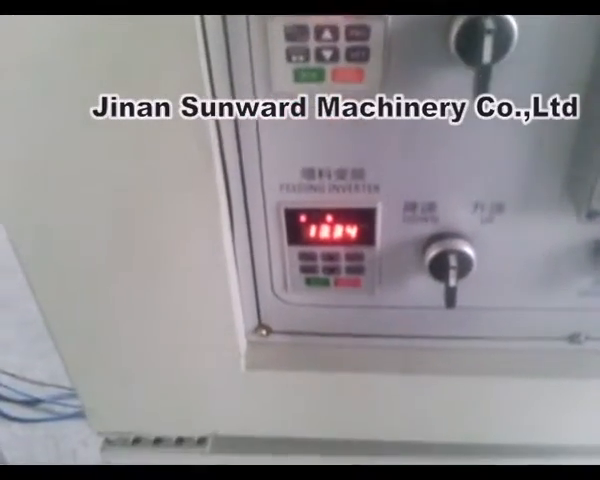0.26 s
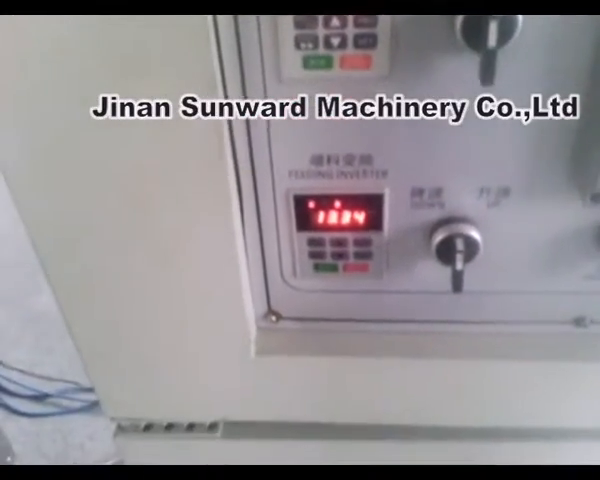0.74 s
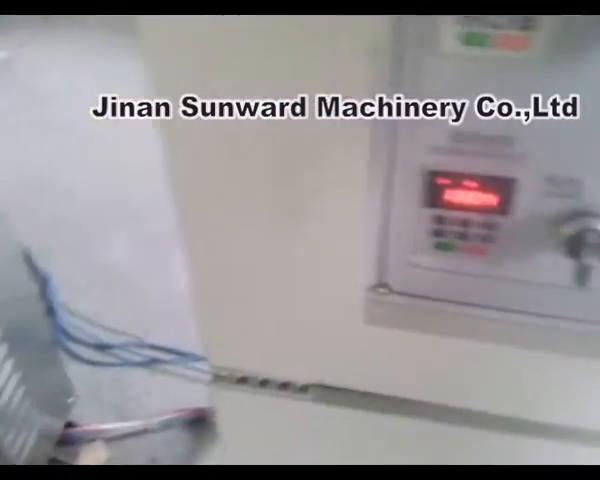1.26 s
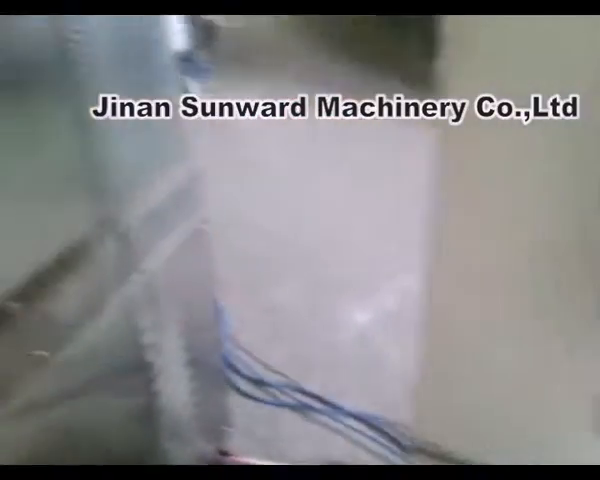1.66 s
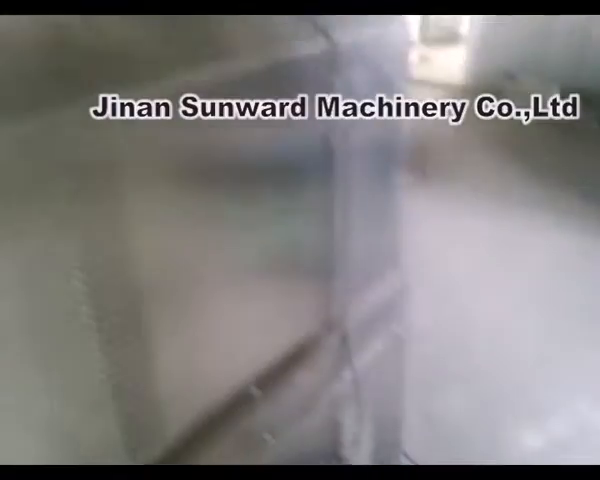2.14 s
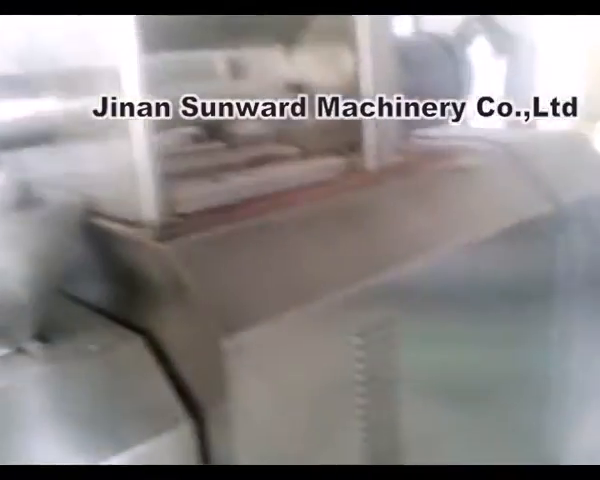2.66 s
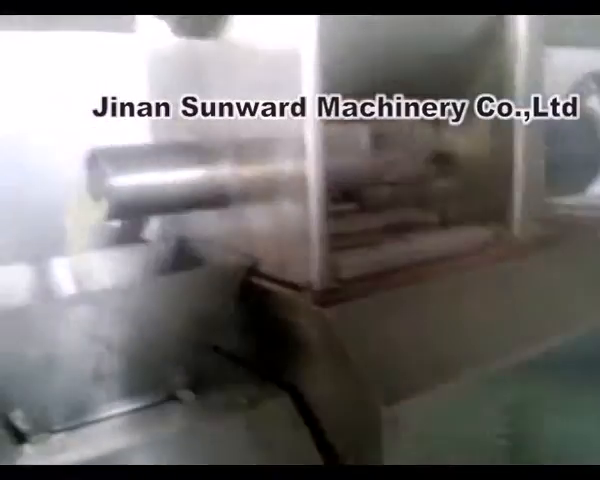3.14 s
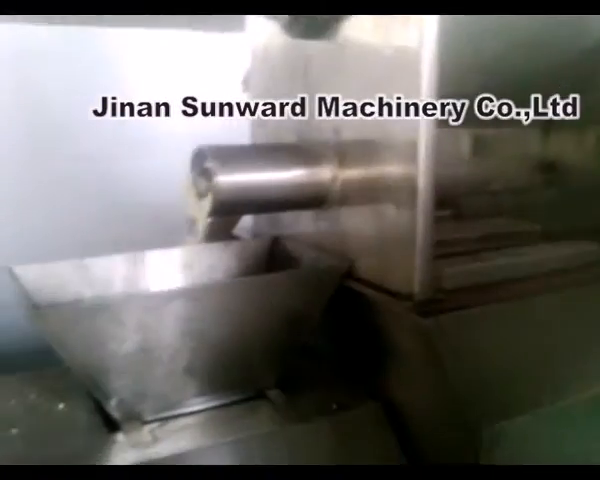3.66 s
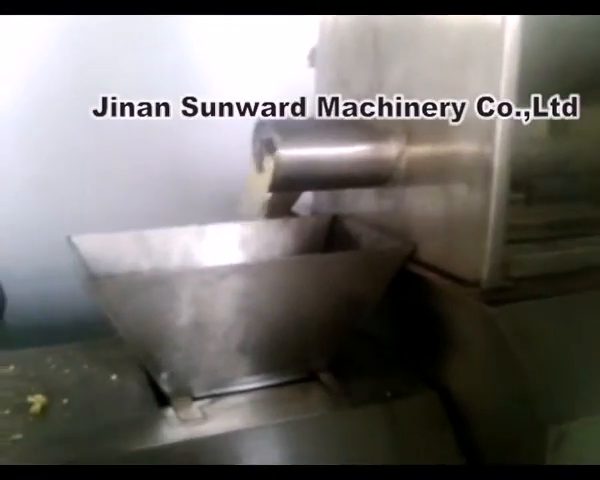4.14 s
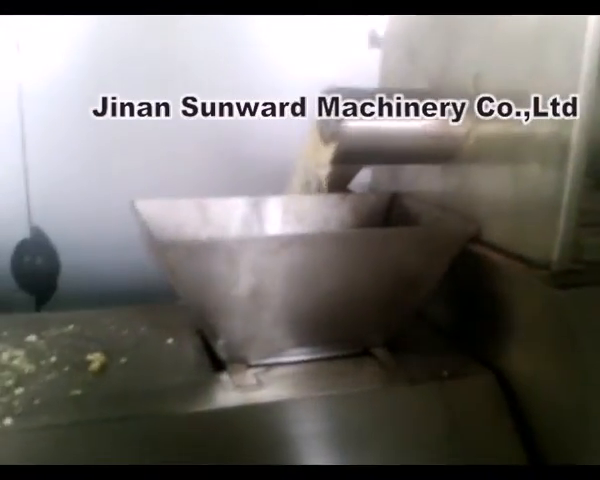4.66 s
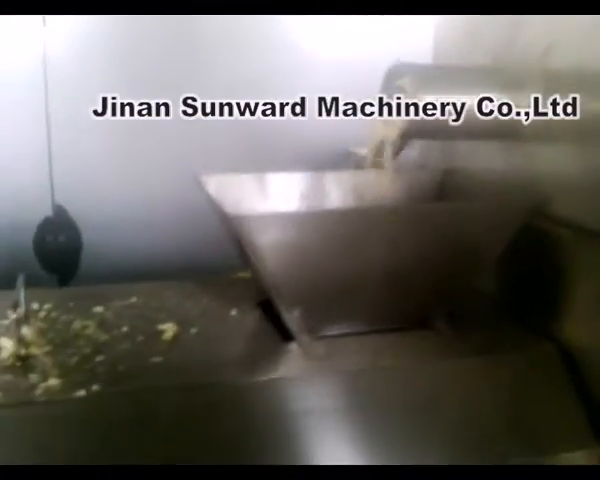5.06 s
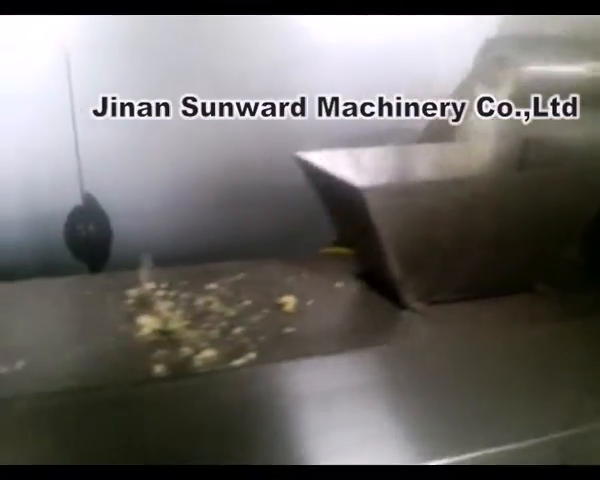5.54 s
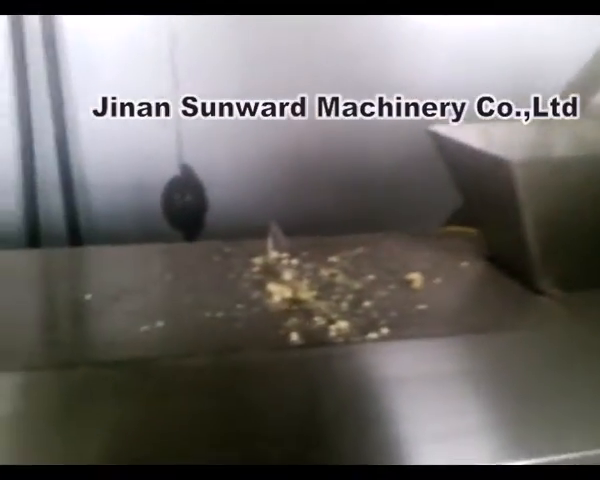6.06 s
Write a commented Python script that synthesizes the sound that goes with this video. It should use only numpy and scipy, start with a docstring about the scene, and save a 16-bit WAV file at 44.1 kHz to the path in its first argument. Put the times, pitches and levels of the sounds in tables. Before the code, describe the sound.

A food machine drones and rumbles steadily under a high wavering electric motor whine, with one sharp metallic knock and faint panel rattles early on.

```python
"""In a workshop a food machine drones while a phone is carried past it. The whine of its inverter-fed motor
is a set of carrier sidebands that fade one by one in the room's standing waves. The gearbox rings in mesh
bands that flare, over rumble, body noise and hiss. A metal part knocks and loose panels rattle.
The phone's low sampling rate cuts the top; crude rate converters leave faint images of the treble."""
import sys
import numpy as np
from scipy import signal
from scipy.fft import rfft, irfft, next_fast_len
from scipy.io import wavfile
from scipy.ndimage import uniform_filter1d, map_coordinates

SR = 44100
rng = np.random.default_rng(int(sys.argv[2]) if len(sys.argv) > 2 else 0)


def generate_wav(sig):
    """Save sig (samples, or channels by samples) to the path in sys.argv[1] as 16-bit PCM at SR."""
    pcm = np.round(np.clip(np.atleast_2d(sig).T, -1, 1) * 32767).astype(np.int16)
    wavfile.write(sys.argv[1], SR, pcm)


def amplitude_ratio(level_db):
    """Convert a level in decibels to the matching linear amplitude (field) ratio."""
    exponent = np.asarray(level_db, float) / 20
    return 10 ** exponent


N = 277830
T = np.arange(N) / SR  # time in seconds


def unit(x):
    """Scaled to rms 1."""
    return x / np.sqrt(np.mean(np.abs(x) ** 2) + 1e-20)


def curves(rows):
    """One value per sample for each column after the time, by straight lines between the rows."""
    seconds, *columns = np.transpose(rows)
    return [np.interp(T, seconds, column) for column in columns]


def wobble(rate):
    """A smooth random curve with rate knots a second."""
    knots = rng.standard_normal(int(N * rate / SR) + 4)
    return map_coordinates(knots, [T * rate])


def filtered(x, response):
    """x shaped by a response, a function of frequency in Hz."""
    m = next_fast_len(N + 8192)
    return irfft(rfft(x, m) * response(np.fft.rfftfreq(m, 1 / SR)), m)[:N]


def bell(hz, centre_hz, width_hz):
    """Gain of a resonance, 1 at its centre."""
    return 1 / np.sqrt(1 + (2 * (hz - centre_hz) / width_hz) ** 2)


def rush(spectrum, patchy_db):
    """Coloured noise of rms 1, with patches of random gain in time and frequency."""
    cells = signal.stft(rng.standard_normal(N), nperseg=512)[2]
    field = uniform_filter1d(rng.standard_normal(cells.shape), size=5, axis=0)
    field = uniform_filter1d(field, size=10, axis=1)
    noise = signal.istft(cells * amplitude_ratio(patchy_db * unit(field)), nperseg=512)[1][:N]
    at_hz, at_db = np.transpose(spectrum)

    def colour(hz):
        return amplitude_ratio(np.interp(np.log(hz + 1), np.log(at_hz), at_db, -120, -120))

    return unit(filtered(noise, colour))


def tone(hz, drift, rough, phase=None):
    """A sine, rms 1 before its flutter, with slow phase drift and fast flutter that spreads a skirt around it."""
    flutter = rough * (1.42 * wobble(16) + wobble(40) + .5 * wobble(250))
    start = 2 * np.pi * rng.random() if phase is None else phase
    angle = 2 * np.pi * hz * T + start + drift * wobble(3) + rough * wobble(60)
    return np.sqrt(2) * (1 + flutter) * np.sin(angle)


def passing(events, hz, width_hz):
    """Summed dB of the bell-shaped events that lie near a pitch."""
    total_db = 0 * T
    for s, at_hz, db, spread_s in events:
        if abs(hz - at_hz) < 3 * width_hz:
            off_pitch, off_time = (hz - at_hz) / width_hz, (T - s) / spread_s
            total_db += db * np.exp(-.5 * off_pitch ** 2 - .5 * off_time ** 2)
    return total_db


def whine():
    """The switching carrier and its double, split by the drive frequency and hazed with noise; slot tones."""
    carrier_hz, drive_hz = 3349.55, 23.92
    node_width_hz = 16  # a node spares the neighbouring tones
    haze_follows = 0.58  # share of the whine's swings in dB
    # Whine tones. Each row: carrier multiple, drive multiple.
    sidebands = [(1, -5), (1, -1), (1, 1), (1, 5), (2, -2), (2, 0), (2, 2)]
    # Strength of those tones away from any node, one relative dB for each.
    shares_db = [-5, -3, -4, -6.5, -3.5, -0.5, -10.5]
    # Slot tones. Each row: pitch in Hz, rms in dB away from any node.
    slots = [(6154, -58), (6202.4, -39.5), (6381, -42), (6487, -50), (6593.5, -40), (6795, -55),
             (6808, -56), (6912, -56), (7196.3, -50)]
    # Whine reaching the walking microphone. Each row: time in seconds, level in dB around the carrier,
    # level in dB around its double.
    whine_levels = [(0.0, -40, -22.5), (0.26, -38.5, -30.5), (1.21, -35, -23), (1.26, -29.5, -19.5),
                    (1.58, -29.5, -18), (1.75, -24.5, -18.5), (1.93, -33, -28.5), (2.17, -30, -32.5),
                    (2.39, -36.5, -22.5), (2.47, -39, -24), (2.63, -29.5, -28), (2.72, -34, -23.5),
                    (2.91, -31.5, -35), (3.09, -34, -26), (3.26, -32, -37.5), (3.4, -30, -25.5),
                    (3.58, -36, -36), (3.67, -35.5, -26.5), (3.91, -33, -30.5), (4.16, -30.5, -22.5),
                    (4.74, -34.5, -32.5), (5.19, -35, -25), (5.51, -33.5, -34), (5.74, -29.5, -29.5),
                    (5.88, -37.5, -27.5), (6.3, -33.5, -35)]
    # Standing-wave nodes and crests that the microphone passes. Each row: middle in seconds, tone in Hz,
    # change in dB (within the carrier groups before their overall level is set), time spread in seconds.
    nodes = [(0.0, 6699, -16, 0.18), (0.05, 6202, -9, 0.21), (1.22, 6202, -6, 0.12),
             (2.45, 6381, -14, 0.04), (0.48, 3373, -17, 0.3), (0.64, 6699, -14, 0.045),
             (0.6, 6381, -15, 0.55), (0.68, 7196, -13, 0.65), (1.65, 6381, -14, 0.12),
             (1.62, 3469, -10, 0.34), (1.96, 6699, -15, 0.077), (2.0, 6652, -12.5, 0.47),
             (2.12, 6699, -14, 0.04), (2.28, 6747, -16, 0.044), (2.22, 6594, -14, 0.1),
             (2.45, 6202, -9, 0.21), (2.4, 3326, -9, 0.039), (2.45, 3469, -6, 0.07), (2.8, 3469, -10, 0.05),
             (3.2, 3469, -8, 0.055), (3.25, 6202, -9, 0.068), (2.56, 6699, -19, 0.055),
             (2.6, 6652, -23, 0.069), (2.8, 6699, -16, 0.085), (3.04, 3230, -13, 0.31),
             (2.95, 6202, -10, 0.05), (3.08, 3373, -20, 0.054), (3.3, 7196, -12, 0.35),
             (3.15, 6381, -12, 0.04), (3.45, 6652, -12, 0.1), (3.53, 3373, -10, 0.12),
             (3.5, 6381, -16, 0.1), (3.8, 6381, -16, 0.1), (3.72, 3326, -18, 0.075), (3.4, 6594, -20, 0.07),
             (3.68, 6747, -22, 0.1), (3.81, 6699, -20, 0.07), (3.95, 6202, -12, 0.16),
             (4.1, 3469, -9, 0.22), (4.16, 6652, -9.5, 0.14), (4.22, 6747, -14, 0.12),
             (4.4, 3230, -27, 0.39), (4.2, 6594, -18, 0.25), (4.85, 6594, -16, 0.13),
             (4.74, 6699, -20, 0.08), (4.8, 6381, -18, 0.25), (4.95, 6202, -17, 0.3),
             (5.95, 6699, -12, 0.04), (5.42, 6652, -14, 0.1), (5.52, 6699, -9, 0.1),
             (5.48, 3373, -11, 0.12), (5.64, 6652, -20, 0.045), (5.78, 3230, -24, 0.08),
             (5.78, 6381, -16, 0.069), (5.75, 6699, -14, 0.04), (5.62, 6202, 4, 0.07),
             (5.81, 6202, -15, 0.04), (5.88, 3326, -9, 0.07), (5.5, 6594, -22, 0.2), (6.1, 6594, -14, 0.25),
             (5.9, 7196, -10, 0.089), (5.92, 3469, -9, 0.095), (6.15, 6381, -18, 0.05),
             (6.1, 6202, -13, 0.14), (6.2, 3326, -18, 0.058)]

    out, levels_db = 0, curves(whine_levels)
    path = 1.34 * wobble(1.99)  # the walking microphone shifts the phase of all sidebands together
    for k, haze_db, haze_hz in [(1, -23.5, 200), (2, -23.0, 180)]:
        group = [(n, k * carrier_hz + n * drive_hz, db)
                 for (m, n), db in zip(sidebands, shares_db) if m == k]
        gains = amplitude_ratio([db + passing(nodes, hz, node_width_hz) + .7 * wobble(4.7) for n, hz, db in group])
        # the tones share out the level of their group
        gains = gains * amplitude_ratio(levels_db[k - 1]) / np.sqrt(np.sum(gains ** 2, axis=0))
        for (n, hz, db), gain in zip(group, gains):
            # sidebands in quadrature to their centre: the pitch warbles more than the level throbs
            phase = k * path + np.pi / 2 * (n != 0)
            out = out + gain * tone(hz, drift=1.2 / k ** 1.5, rough=.08, phase=phase)
        haze = filtered(rng.standard_normal(N), lambda hz: bell(hz, k * carrier_hz, haze_hz) ** 2)
        out = out + amplitude_ratio(haze_db + haze_follows * levels_db[k - 1]) * unit(haze)
    for hz, db in slots:
        level_db = db + passing(nodes, hz, node_width_hz) + 1.1 * wobble(3.9)
        out = out + amplitude_ratio(level_db) * tone(hz, drift=1.0, rough=0.14)
    return out


def gearbox():
    """Tooth contact: a wavering tone in narrow noise for each mesh band, uneven in level, with flares."""
    # Each row: centre in Hz, width in Hz (the noise is set three times as wide), rms in dB between flares.
    mesh_bands = [(748, 21, -40), (922, 18, -42), (571, 24, -46.5), (351, 12, -49.5)]
    # Flares of a mesh band. Each row: middle in seconds, band in Hz, gain in dB, time spread in seconds.
    flares = [(0.58, 571, 8, 0.09), (0.3, 748, 5.5, 0.3), (0.84, 922, 10, 0.16), (1.13, 922, 12, 0.04),
              (1.4, 748, 13, 0.059), (1.3, 922, 9, 0.037), (1.55, 922, 8, 0.027), (1.88, 748, 11, 0.078),
              (2.12, 748, 11, 0.025), (2.32, 922, 8.5, 0.035), (2.36, 748, 10.5, 0.061),
              (3.06, 571, 11, 0.06), (3.3, 922, 15, 0.11), (3.39, 748, 16, 0.025), (3.66, 922, 9, 0.05),
              (3.5, 351, 8.5, 0.32), (3.87, 748, 12, 0.047), (4.24, 922, 13.5, 0.039), (4.3, 351, 4, 0.2),
              (4.88, 748, 7, 0.017), (5.7, 351, 7.5, 0.59), (4.9, 922, 7, 0.018), (5.92, 748, 10.5, 0.1),
              (6.14, 922, 8, 0.05)]

    out = 0
    for hz, width_hz, db in mesh_bands:
        fuzz = unit(filtered(rng.standard_normal(N), lambda f: bell(f, hz, 3 * width_hz) ** 2))
        level_db = db + passing(flares, hz, 60) + 2.1 * wobble(22)
        out = out + amplitude_ratio(level_db) * unit(tone(hz, drift=2.2, rough=.32) + .8 * fuzz)
    return out


def drone():
    """Rumble through the casing, body noise of shafts and belts, hiss of fans; all swell with nearness."""
    # Nearness of the machine. Each row: time in seconds, body level in dB (trimmed slightly below).
    nearness = [(0.0, -38.5), (0.17, -39), (1.51, -36), (2.03, -37), (2.42, -35.5), (3.19, -37.5),
                (3.77, -36.5), (5.28, -37.5), (6.3, -36.5)]
    # Spectra of the rumble, the body noise and the hiss. Each row: frequency in Hz, relative dB per Hz.
    rumble_spectrum = [(15, -67.5), (25, -29), (65, -33), (81, -25), (178, -3.5), (252, -6.5), (346, -8),
                       (468, -7.5), (695, -5.5), (740, -6), (814, -7.5), (939, -7.5), (1100, -17),
                       (1430, -60), (2420, -120)]
    body_spectrum = [(700, -30), (900, -0.5), (1100, -1), (1450, 1), (2000, -0.5), (2400, -4), (2800, -9.5),
                     (3300, -6.5), (3900, -29.5)]
    hiss_spectrum = [(2800, -30), (3500, 2.5), (4400, -2), (5000, -1), (5700, -1), (6300, 4), (6900, -1.5),
                     (7300, -1.5), (7600, -58)]
    # Casing resonances. Each row: centre in Hz, width in Hz, gain in dB of each taken alone.
    housing = [(190, 41, 1), (351.5, 16, 7), (515.4, 20, 5), (767, 8.1, 9)]

    def casing(hz):
        return 1 + sum((amplitude_ratio(db) - 1) * bell(hz, centre, width) ** 2 for centre, width, db in housing)

    body_db, = curves(nearness)
    mean_db = body_db.mean()
    swing_db = body_db - mean_db
    rumble = unit(filtered(rush(rumble_spectrum, patchy_db=2.0), casing))
    load_db = 0.1 * wobble(13)
    # rumble and hiss: offset from the mean body level in dB, then the share of its swings they follow
    rumble = amplitude_ratio(mean_db + 4.5 + 0.25 * swing_db + load_db) * rumble
    body = amplitude_ratio(body_db - 0.22 + load_db) * rush(body_spectrum, patchy_db=1.6)
    hiss = amplitude_ratio(mean_db - 5 + 0.91 * swing_db) * rush(hiss_spectrum, patchy_db=1.5)
    return rumble + body + hiss


def knocks():
    """A loose metal part is struck: its modes ring, low ones slower to speak, over clatter; far ones duller."""
    # Each row: start in seconds, ring gain in dB, clatter gain in dB, dulling in dB per octave above 3 kHz.
    blows = [(1.214, 0, -21, 0), (1.2252, -13, -25, 0), (2.688, -44, -25, 22), (2.713, -42, -27, 14)]
    # Modes of the part. Each row: pitch in Hz, relative level in dB, time to fall 60 dB in seconds.
    part = [(272, -11.5, .1), (1428, -8, .07), (1890, -17, .09), (2100, -18, .1), (2295, -18, .09),
            (4705, -9, .025), (4990, 7, .014), (5136, -7, .02), (5480, -14, .03), (5725, -19, .04)]
    # Clatter spectrum. Each row: frequency in Hz, relative dB per Hz.
    clatter_spectrum = [(900, -20), (1400, -5), (2300, 0), (3200, -11), (4200, -7), (5100, -1), (5900, -7),
                        (6600, -25)]

    out, t = np.zeros(N), T[:SR // 4]
    grains = unit(amplitude_ratio(3 * wobble(400)))
    clatter = rush(clatter_spectrum, patchy_db=1.5) * grains
    for s, ring_db, clatter_db, dull_db in blows:
        at, blow, ring = round(s * SR), np.zeros(N), 0
        for hz, db, t60 in part:
            decay = amplitude_ratio(db + rng.normal(0, 1.0) - 60 * t / t60)
            ring = ring + decay * np.sin(2 * np.pi * hz * t) * (1 - np.exp(-t * hz / 4))
        # a quick fall with a weaker, longer tail
        burst = (amplitude_ratio(-60 * t / .07) + .2 * amplitude_ratio(-60 * t / .22)) * clatter[at:at + len(t)]
        onset = 1 - np.exp(-t / .0028)
        blow[at:at + len(t)] = (amplitude_ratio(ring_db) * ring + amplitude_ratio(clatter_db) * burst) * onset
        out += filtered(blow, lambda hz: amplitude_ratio(-dull_db * np.log2(np.maximum(hz / 3000, 1))))
    return out


def rattle():
    """Loose panels buzz briefly at their own pitches, a few times clearly and many times faintly; the part
    knocked at 2.69 s also rings here."""
    # Clearest rattles of the sheet metal; the last two rows are the ring of the part struck at 2.69 s. Each
    # row: start in seconds, peak in dB before the buzz, pitch in Hz.
    clear = [(1.3, -30.5, 1330), (1.44, -30, 1536), (1.52, -31, 1170), (1.65, -31, 1310),
             (1.775, -31.5, 1900), (1.81, -33, 2080), (2.04, -34, 1390), (2.156, -31, 1510),
             (2.691, -33, 2600), (2.731, -31, 1690)]
    # Pitches in Hz at which the panels ring.
    panel_hz = [1198, 1464, 1680, 2032]
    faintest_db, t60_s, rise_s = -42, 0.087, 0.0043

    draw = rng.random((260, 4))  # columns: time, panel, detuning, strength
    panel = (draw[:, 1] * len(panel_hz)).astype(int)
    faint_hz = np.take(panel_hz, panel) * (1 + 0.091 * (draw[:, 2] - .5))
    faint_db = faintest_db - 1.98 * np.log(draw[:, 3] + 1e-3)
    faint = np.transpose([draw[:, 0] * T[-1], faint_db, faint_hz])
    out, t = np.zeros(N + SR), T[:SR // 8]
    shape = amplitude_ratio(-60 * t / t60_s) * (1 - np.exp(-t / rise_s))
    shape = shape / shape.max()
    buzz = .6 + .8 * wobble(350)  # chattering contact roughens the ring
    for s, db, hz in [*clear, *faint]:
        out[round(s * SR):][:len(t)] += amplitude_ratio(db) * shape * np.sin(2 * np.pi * hz * t)
    return out[:N] * buzz


def scene():
    """All sources at one microphone."""
    return (whine() + gearbox() + drone() + knocks() + rattle())[None]


def top_cut(x):
    """Nothing passes above the cut-off."""
    return signal.sosfilt(signal.butter(12, 15660, fs=SR, output="sos"), x)


def record(dry):
    """The phone: a low sampling rate, converter images of the top band, one click and a faint noise floor."""
    # Converter images. Each row: mirrored 1 or shifted 0, the Hz that a tone is subtracted from (mirrored)
    # or moved by (shifted), gain in dB at 6700 Hz, slope in dB per kHz.
    images = [(1, 16000, -21.5, 18.5), (0, 3900, -30, 5), (0, -3900, -32.5, 2), (1, 19900, -44, 17),
              (0, 7800, -42.5, 12)]
    # A single-sample click: time in seconds, height in dB.
    tick_s, tick_db = (2.1501, -27)

    m = 2 * N  # even length with a known bin width
    z, hz = rfft(dry[0], m), np.fft.rfftfreq(m, 1 / SR)
    z = z * np.clip((7700 - hz) / 450, 0, 1) ** 2  # the low sampling rate ends the band
    out = z.copy()
    top = np.flatnonzero((hz > 5200) & (hz < 7700))
    for mirrored, about_hz, db, slope in images:
        leak = z[top] * amplitude_ratio(db + slope * (hz[top] - 6700) / 1000)
        shift = round(round(about_hz / 100) * 100 * m / SR)
        if mirrored:
            out[shift - top] += np.conj(leak)
        else:
            out[shift + top] += leak
    # the lower whine is mirrored too, faintly
    low = np.flatnonzero((hz > 3000) & (hz < 3600))
    out[round(16000 * m / SR) - low] += amplitude_ratio(-53) * np.conj(z[low])
    floor = rush([(6000, 0), (8500, 0), (11000, -10), (15500, -13)], patchy_db=3)  # (Hz, relative dB per Hz)
    x = irfft(out, m)[:N] + amplitude_ratio(-78) * floor
    x[round(tick_s * SR)] += amplitude_ratio(tick_db)
    return top_cut(x[None])


dry = scene()
out = record(dry)
generate_wav(out)
```